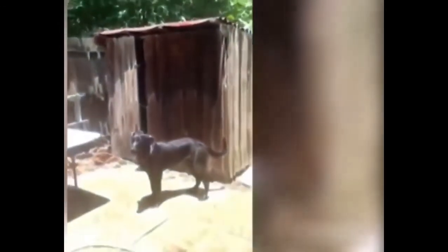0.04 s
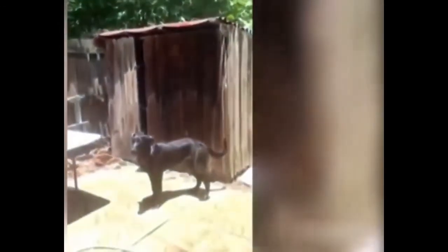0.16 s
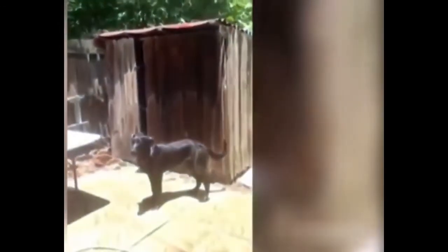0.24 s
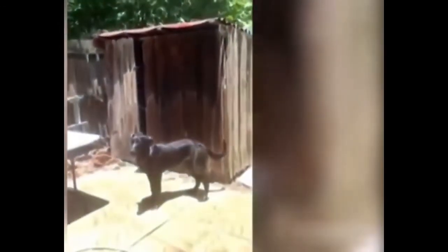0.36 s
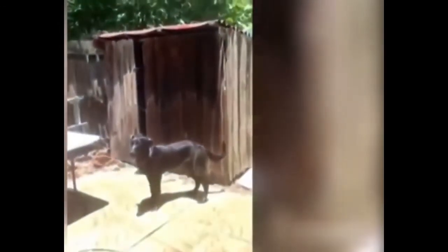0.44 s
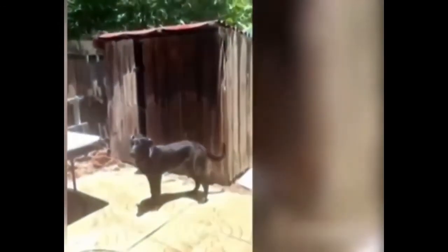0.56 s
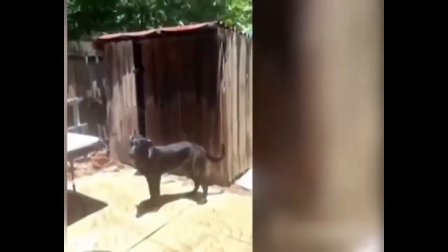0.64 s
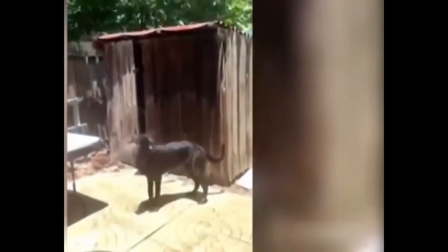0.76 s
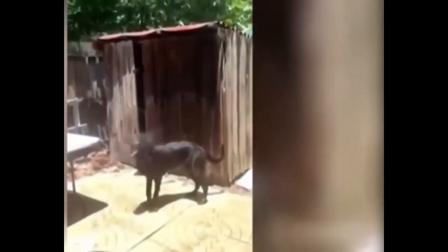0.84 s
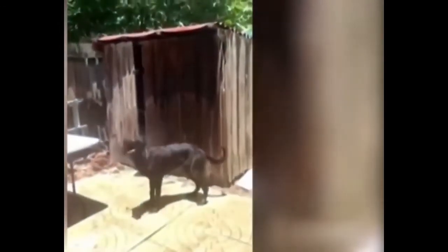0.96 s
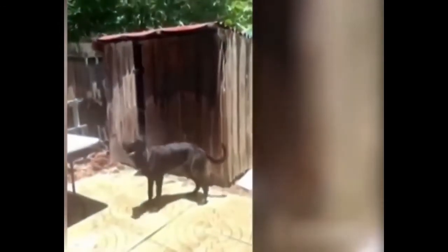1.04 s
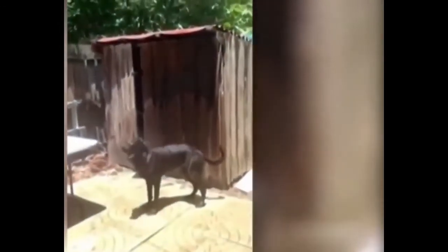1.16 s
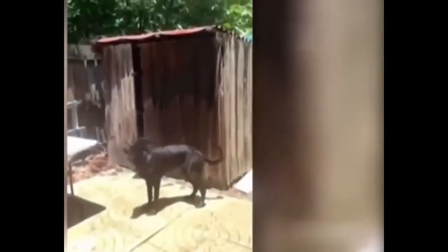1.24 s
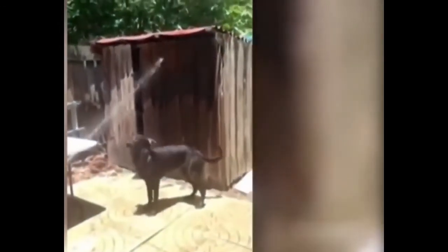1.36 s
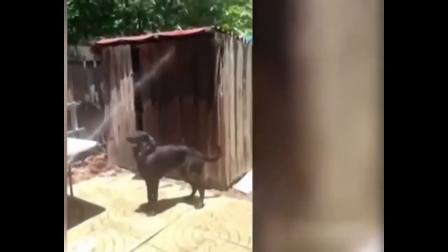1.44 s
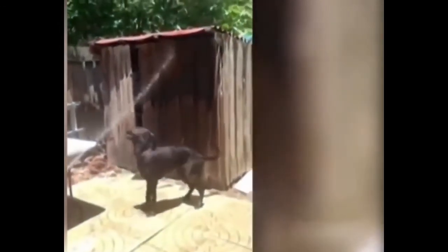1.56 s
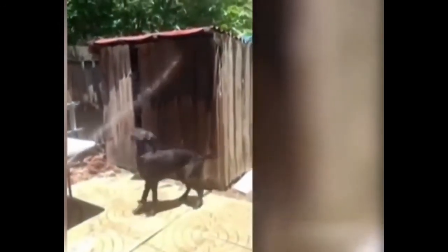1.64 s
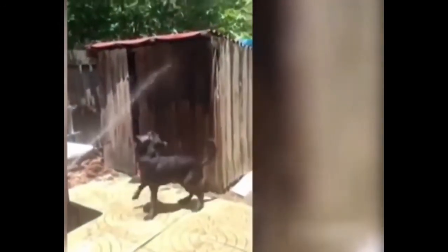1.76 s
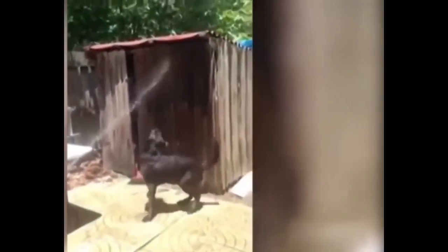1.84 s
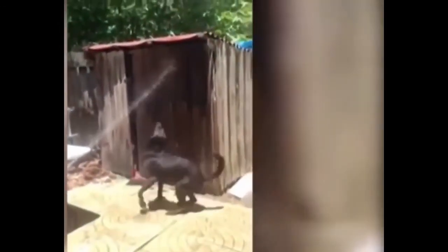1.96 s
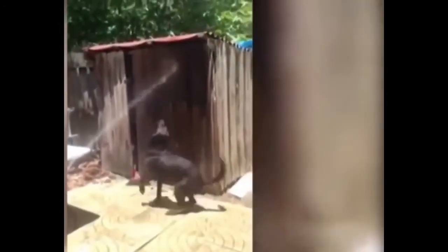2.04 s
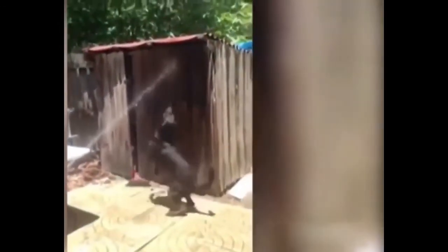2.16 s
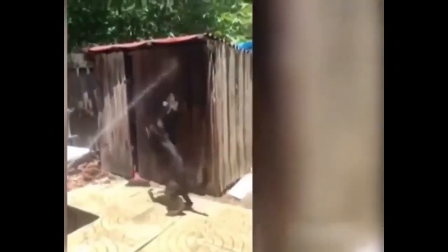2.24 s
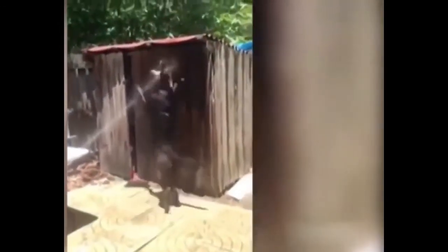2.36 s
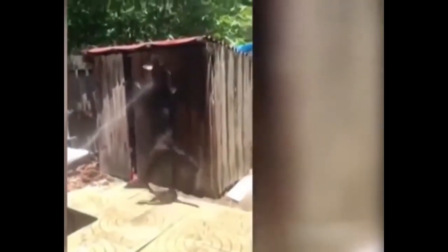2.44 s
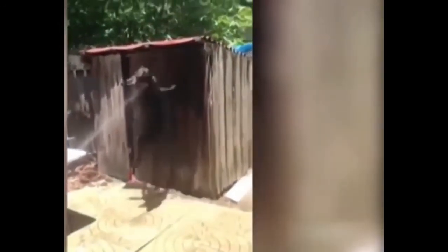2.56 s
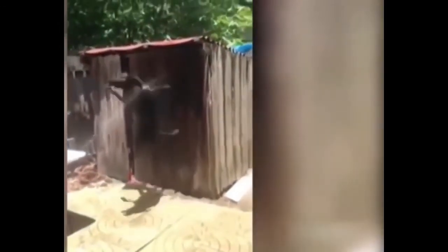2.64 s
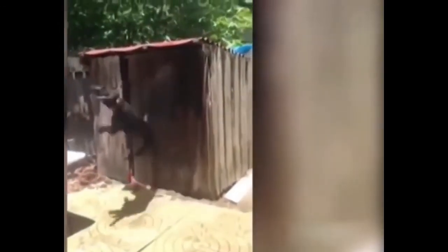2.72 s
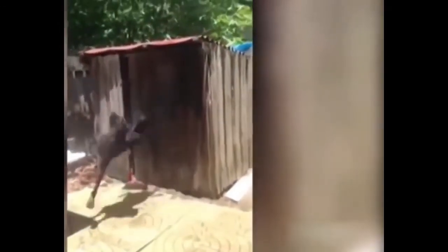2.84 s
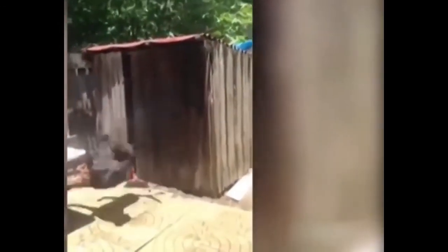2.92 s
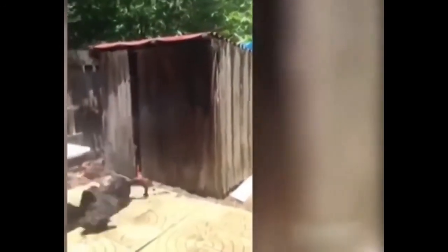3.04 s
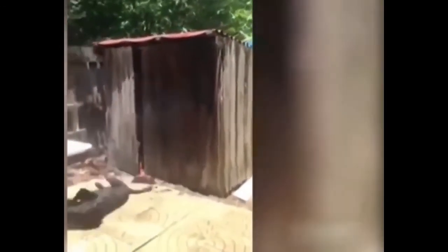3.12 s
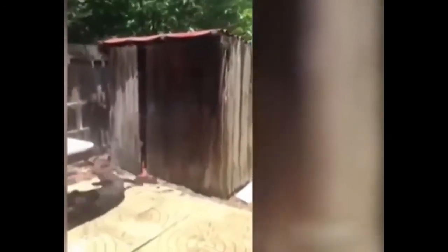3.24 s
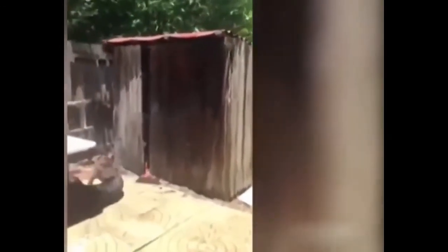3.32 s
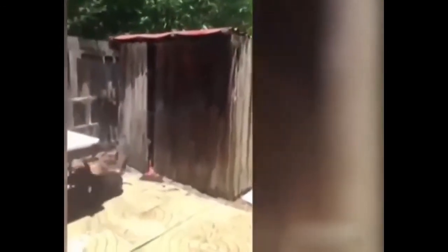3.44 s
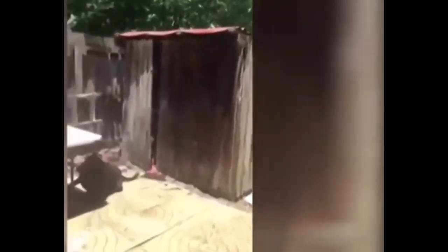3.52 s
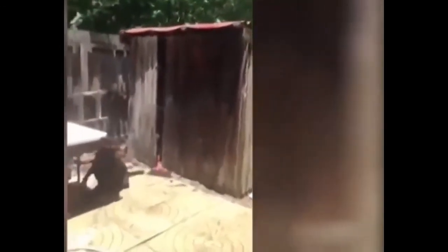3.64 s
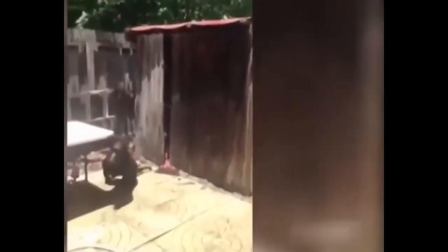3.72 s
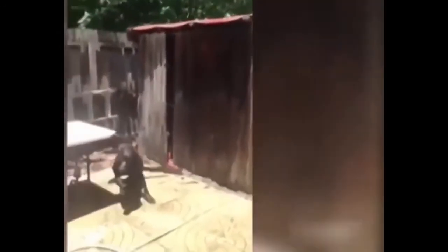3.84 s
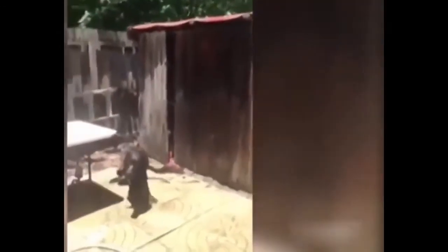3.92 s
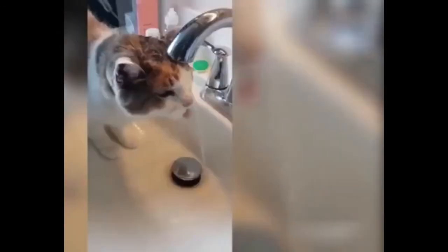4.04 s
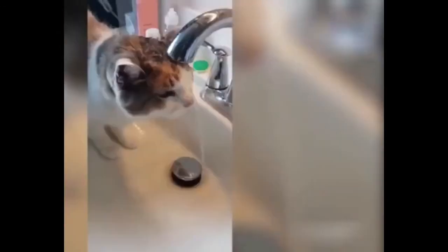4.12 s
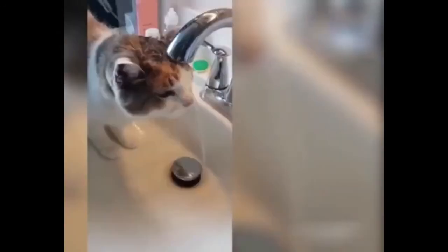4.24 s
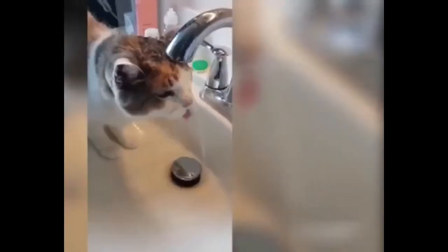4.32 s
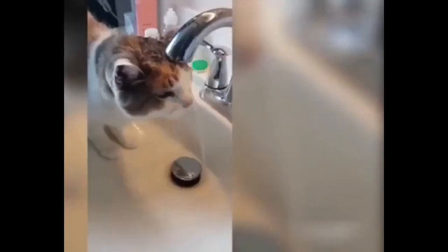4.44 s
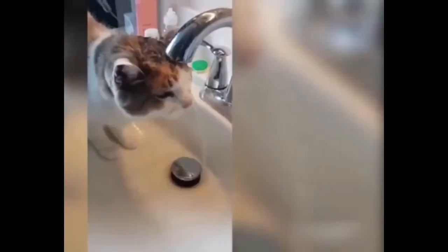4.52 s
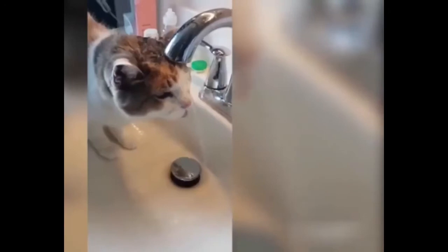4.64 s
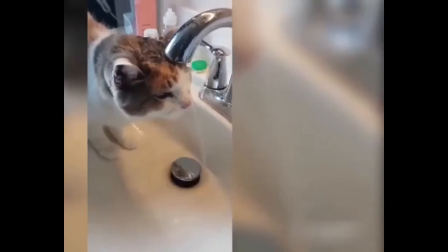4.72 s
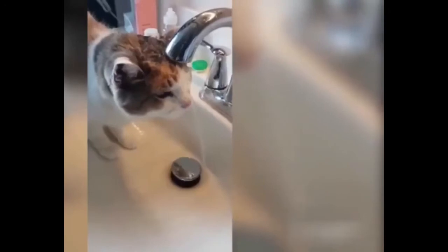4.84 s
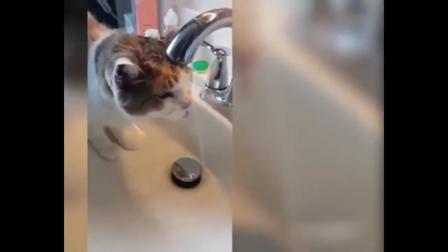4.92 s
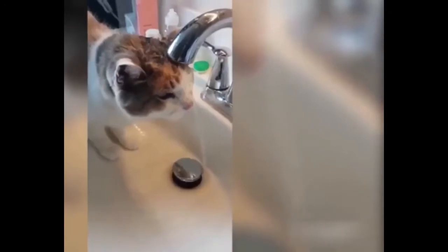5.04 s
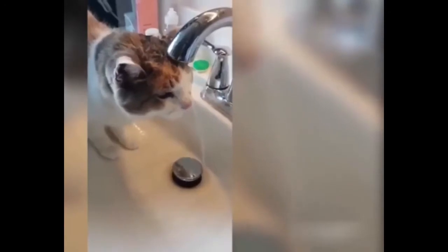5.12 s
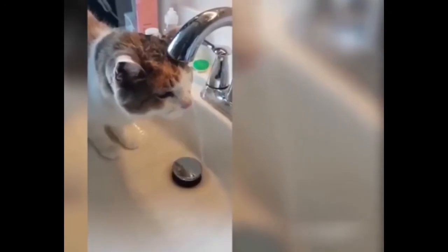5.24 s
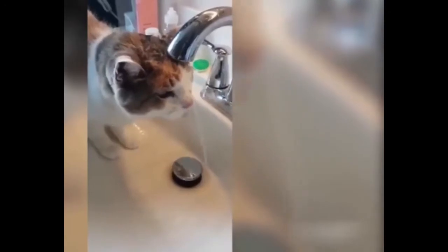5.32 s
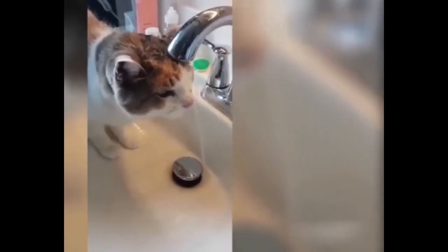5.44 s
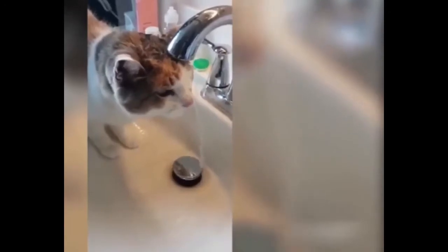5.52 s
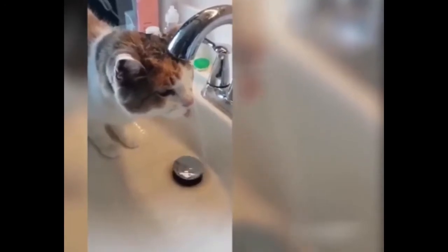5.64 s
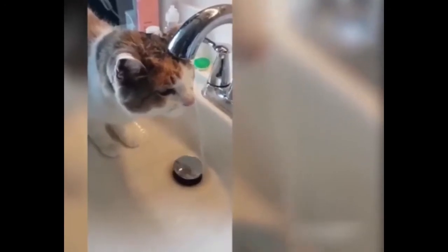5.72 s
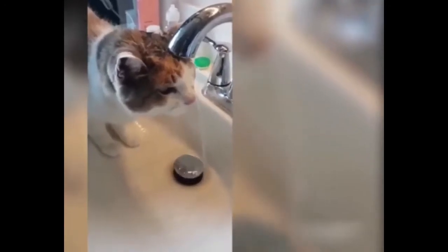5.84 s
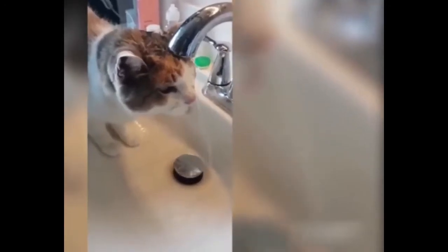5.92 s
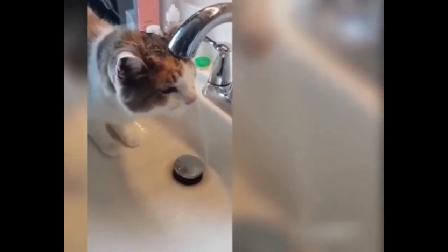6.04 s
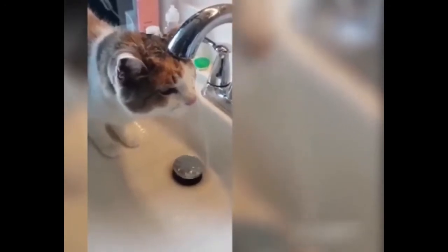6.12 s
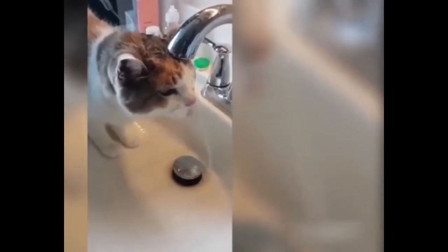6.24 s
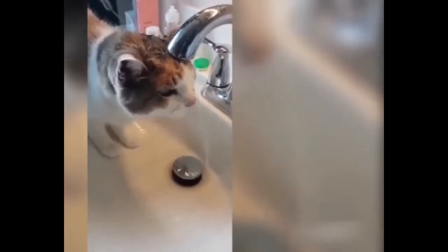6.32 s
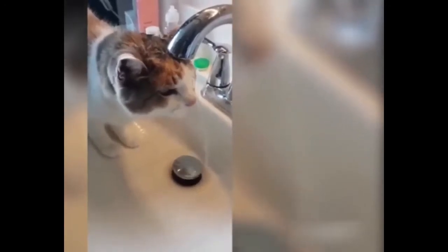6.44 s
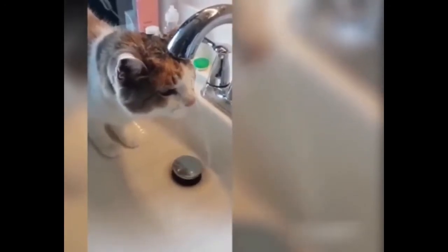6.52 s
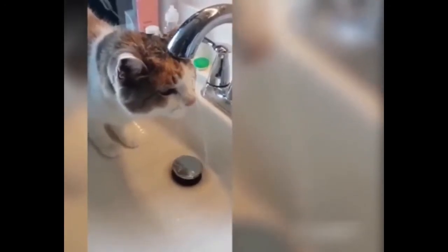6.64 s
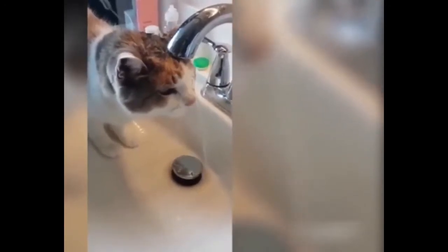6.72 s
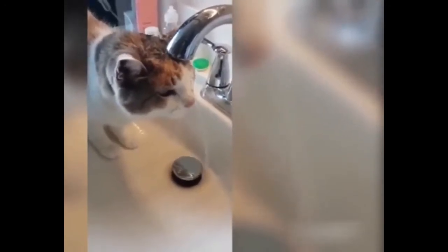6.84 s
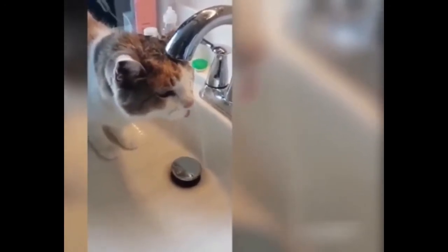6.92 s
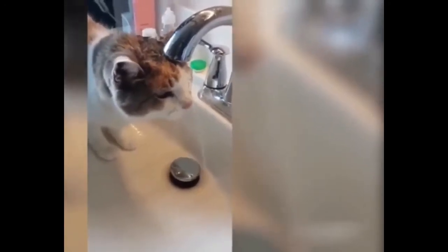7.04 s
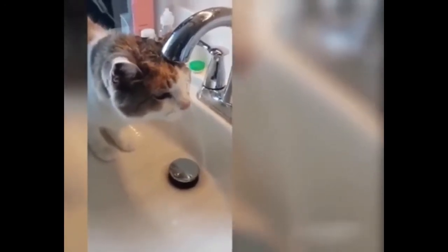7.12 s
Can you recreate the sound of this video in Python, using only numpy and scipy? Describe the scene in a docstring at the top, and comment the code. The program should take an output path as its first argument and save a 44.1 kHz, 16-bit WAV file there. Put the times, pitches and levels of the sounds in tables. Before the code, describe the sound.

The sound opens in a quiet yard with soft air and a low, distant machine hum. A bird gives one faint, falling whistle at about 0.3 seconds. From 0.8 to 1.4 seconds a garden hose spits, and at 1.6 its jet starts hissing and pattering on a wooden shed, surging briefly at 2.5. A dog's collar tags jingle on and off from 1.1 to 3.9 seconds. Between 2.9 and 3.3 the dog hits the shed and ground with several rattling, booming thumps, the loudest sounds here. Paws scuff lightly on paving and the spray fades. At about 4.1 seconds the sound cuts to a bathroom, where a thin tap stream fizzes softly and steadily in a sink over a low room murmur. About six drops plink in the drain, clearest at 5.2 and 5.5. Tiny bubbles tick close by on both sides, the sharpest near 6.9 seconds.

```python
"""Dog, garden hose and sink

A bird whistles in a quiet yard. A hose spits, then its jet hisses and drums on a wooden shed.
A dog with jingling collar tags leaps at the water, thumps against the boards and runs off.
Then a bathroom: a thin stream from a tap fizzes in the sink, falling drops make the drain
pipe plink, and tiny bubbles burst with sharp ticks."""
import sys
import numpy as np
from scipy import signal
from scipy.fft import rfft, irfft, next_fast_len
from scipy.io import wavfile
from scipy.ndimage import uniform_filter1d, map_coordinates

SR = 44100
rng = np.random.default_rng(int(sys.argv[2]) if len(sys.argv) > 2 else 0)


def dump(signal):
    """Clip the signal to [-1, 1] and save it as 16-bit WAV at the path in sys.argv[1]."""
    limited = np.clip(np.atleast_2d(signal).T, -1, 1)
    pcm = np.round(limited * 32767).astype(np.int16)
    wavfile.write(sys.argv[1], SR, pcm)


N = 316197

# A "fade" is the time a sound takes to die down by 60 dB. A "mode" is one ringing tone of an object.
# outdoor air (frequency [Hz], level [dB])
AIR_SPECTRUM = [(15, -48), (25, -42), (49, -0.5), (154, -9), (181, -10.5), (237, -3.5), (515, -17.5),
                (1420, -22), (2560, -28), (2930, -28), (12100, -43), (15000, -40)]
# far machinery (frequency [Hz], width [Hz], level [dB])
MACHINE_MODES = [(73, 12, -6), (151.5, 6.8, -4.5), (236.3, 4.6, 0.5)]
# echo off the fence and shed (frequency [Hz], fade [s])
YARD_ECHO = [(200, 0.4), (4000, 0.36), (12000, 0.3)]
# nozzle spits (time [s], level [dB], rise [s], fade [s], centre [Hz], width [share of centre])
NOZZLE_SPITS = [(.773, -40.5, 0.0027, 0.057, 5870, 1), (.777, -51.5, 0.004, 0.25, 3180, 0.5),
                (.89, -49.5, 0.033, 0.34, 7900, 3.5), (.935, -42, 0.024, 0.23, 7500, 3.5),
                (1.056, -42.5, 0.0021, 0.04, 3770, 0.65), (1.165, -56.5, 0.016, 0.4, 3630, 1.3),
                (1.356, -42.5, 0.018, 0.074, 5140, 1.1)]
# louder clashes of the collar tags (time [s], level [dB])
TAG_CLASHES = [(1.11, -54), (1.131, -48), (1.1742, -39.5), (1.191, -35), (1.270, -42), (1.3416, -41),
               (1.5058, -44), (1.6354, -33.5), (1.812, -35.5), (2.039, -42), (2.722, -33), (2.83, -36.5),
               (3.334, -43.5), (3.407, -45), (3.497, -38)]
# ringing of the tags (frequency [Hz], level [dB], fade [s])
TAG_MODES = [(5700, -22.5, 0.08), (7010, -11, 0.12), (7978, -12.5, 0.15), (8760, -3.5, 0.11),
             (8830, -13.5, 0.07), (11230, -17, 0.062), (12850, -21, .17), (14700, -16, 0.09),
             (14900, -18, 0.12)]
# the jet's hiss (frequency [Hz], level [dB])
HISS_SPECTRUM = [(1500, -4), (4000, 4.5), (7000, 0.5), (10000, 1.5), (12500, 4.5), (15000, 1)]
# drops hitting the shed (frequency [Hz], level [dB])
SPLATTER_SPECTRUM = [(120, -21), (300, 3.5), (600, 3), (1100, -2), (2000, 3), (2800, -1), (3800, 0),
                     (5200, -8.5), (9000, -5), (15000, -30)]
# paws on paving (time [s], level [dB], rise [s], fade [s], centre [Hz], width [share of centre])
PAW_SCUFFS = [(2.243, -50, .004, .12, 4200, .7), (2.698, -38, 0.01, 0.18, 4330, 0.39),
              (3.39, -52, 0.047, 0.3, 3350, 0.56), (3.454, -40, 0.002, 0.16, 4300, 0.29),
              (3.694, -53.5, 0.0011, 0.031, 2500, 2.2), (3.869, -51.5, .001, 0.067, 4970, 0.88),
              (3.88, -54.5, 0.03, 0.42, 2480, 0.55)]
# the dog hits shed and ground (time [s], level [dB], rise [s], fade [s], brightness [Hz], boom [dB])
DOG_THUMPS = [(2.545, -38, 0.009, 0.079, 860, 1), (2.591, -59, 0.0066, 0.11, 150, 20),
              (2.76, -46, 0.0089, 0.16, 600, -6), (2.88, -21, 0.0013, 0.24, 1440, -5.5),
              (2.891, -26.5, 0.0041, 0.094, 1600, -5), (3.012, -22.5, 0.0056, 0.35, 910, -4),
              (3.035, -28, 0.0052, 0.32, 3720, 1), (3.199, -20, 0.00042, 0.11, 4220, -16),
              (3.222, -33.5, 0.0036, 0.39, 2050, -3), (3.403, -48, 0.0044, 0.038, 300, 3.5),
              (3.621, -57, 0.0089, 0.13, 200, 11)]
# rattle of loose boards (frequency [Hz], level [dB])
BOARD_SPECTRUM = [(24, -41), (40, -26), (59, -6), (111, -7), (142, -3), (182, -7.5), (263, -3.5),
                  (432, -6.5), (541, -6), (1080, -12), (1870, -10), (2920, -17), (3650, -14.5),
                  (15000, -37.5)]
# boom of the shed wall (frequency [Hz], width [Hz], level [dB])
WALL_MODES = [(60.1, 9.1, 4.5), (79, 26, 2.5), (111, 13, -1), (144, 7.9, 3.5), (268, 9.6, 2.5),
              (306, 14, 1.5), (398, 16, -8), (559, 37, -6), (670, 16, -9), (702, 40, -1), (1007, 31, 2),
              (1180, 25, -18)]
# water hitting the basin (frequency [Hz], level [dB])
STREAM_SPECTRUM = [(530, -51), (900, -19), (1070, -7), (1220, -16), (1540, -11.5), (1850, -8), (2500, -2.5),
                   (3510, -10), (4280, -8), (6350, -2), (7470, -7), (8590, -3), (9880, -10), (11800, -11.5),
                   (14500, -16.5)]
# ringing of the thin film of water (frequency [Hz], width [Hz], level [dB])
FILM_MODES = [(2550, 290, -6), (6450, 160, 3.5), (8900, 850, -14), (11400, 380, -7.5)]
# the bathroom's murmur (frequency [Hz], level [dB])
ROOM_SPECTRUM = [(15, -54), (25, -18), (59, -8.5), (130, 1.5), (168, -4), (340, -6.5), (376, -13),
                 (656, -10.5), (714, -13.5), (1400, -19.5), (1820, -37), (3080, -120)]
# the bathroom's stereo spread (frequency [Hz], sides over middle [dB])
STEREO_SPREAD = [(60, -5), (110, -11.5), (200, -10.5), (380, -4.5), (700, -4.5), (1290, -2), (2380, -2.5),
                 (4400, 0.5), (8120, 1), (15000, -1)]
# drops falling into the drain (time [s], low modes [dB], middle modes [dB], upper modes [dB])
DRAIN_DROPS = [(4.104, -45.5, -29.5, -33.5), (4.817, -44, -41, -51), (5.171, -28, -45, -54),
               (5.547, -57, -38, -33), (6.349, -45, -41, -51), (6.742, -43.5, -38.5, -43)]
# ringing of the drain pipe (frequency [Hz], level [dB], fade [s])
PIPE_MODES = [(335, -12, 0.12), (932.6, -7, 0.21), (985, -16, 0.15), (1158, -5.5, 0.054),
              (1773, -1.5, 0.045), (2046, -10.5, 0.065), (2134, -4.5, 0.027), (2240, -2, 0.012),
              (2500, -18, 0.034), (2806, -12.5, 0.05), (4500, -23.5, 0.12)]
# echo of the bathroom (frequency [Hz], fade [s])
BATHROOM_ECHO = [(200, 0.22), (2000, 0.36), (12000, 0.03)]
# bubbles bursting close by (time [s], level [dB], fade [s], centre [Hz], left over right [dB])
BUBBLE_POPS = [(4.213, -50, 0.055, 6700, 7), (4.478, -50, .02, 9700, -13), (5.18, -50, .008, 12400, -11),
               (5.492, -53.5, .06, 4660, 10), (5.513, -50, 0.044, 7640, -2), (5.768, -47, .006, 12500, -14),
               (5.7765, -42, 0.025, 4180, 5), (6.338, -50, .006, 12500, -13),
               (6.628, -42.5, 0.0046, 12400, -20), (6.9356, -27.5, 0.0028, 9900, -13)]


def amp(db):
    """Turn decibels into a factor to multiply by."""
    return 10 ** (np.asarray(db) / 20)


def unit(x):
    """Scale a sound to an average strength (rms) of 1."""
    return x / np.sqrt(np.mean(x ** 2) + 1e-20)


def clock():
    """The time of every sample, in seconds."""
    return np.arange(N) / SR


def ramp(start, length):
    """A straight rise from 0 to 1."""
    return np.clip((clock() - start) / length, 0, 1)


def since(start):
    """Seconds gone by after the start."""
    return np.maximum(clock() - start, 0)


def along(points, hz):
    """Read between (frequency, value) points, on a log frequency scale."""
    frequencies, values = np.transpose(points)
    return np.interp(np.log(hz + 1), np.log(frequencies), values)


def wobble(rate):
    """A smooth curve through `rate` random values a second."""
    return map_coordinates(rng.standard_normal(int(N * rate / SR) + 4), [clock() * rate])


def filtered(x, response):
    """Multiply each frequency in a sound by response(frequency)."""
    n = x.shape[-1]
    padded = next_fast_len(n + SR // 4)
    return irfft(rfft(x, padded) * response(np.fft.rfftfreq(padded, 1 / SR)), padded)[..., :n]


def coloured(x, spectrum):
    """Shape a sound's lows and highs with a spectrum, at strength 1."""
    return unit(filtered(x, lambda hz: amp(along(spectrum, hz))))


def resonant(x, modes):
    """Let a sound ring through (frequency, width, level) modes, at strength 1."""
    def response(hz):
        return sum((-1) ** k * amp(db) * 1j * hz * width / (centre ** 2 - hz ** 2 + 1j * hz * width)
                   for k, (centre, width, db) in enumerate(modes))
    return unit(filtered(x, response))


def patter(rate, spread_db, n=N):
    """Tiny impacts of random size, about `rate` a second."""
    hits = rng.random(n) < rate / SR
    return unit(hits * rng.standard_normal(n) * amp(spread_db * rng.standard_normal(n)))


def patchy(x, depth_db, bands):
    """Make the tone colour flicker, in patches some tens of milliseconds long."""
    slices = signal.stft(x, nperseg=512)[2]
    patches = uniform_filter1d(rng.standard_normal(slices.shape), bands, axis=0)
    patches = uniform_filter1d(patches, size=8, axis=1)
    return unit(signal.istft(slices * amp(depth_db * unit(patches)), nperseg=512)[1][:len(x)])


def swell(rise, fade):
    """Half a second of loudness shape: a straight rise, then a steady dying away."""
    t = np.arange(SR // 2) / SR
    return np.minimum(t / max(rise, 1 / SR), 1) * amp(-60 * np.maximum(t - rise, 0) / fade)


def add(track, time, sound):
    """Mix a sound into a track at a time in seconds."""
    start = round(time * SR)
    part = track[..., start:start + sound.shape[-1]]
    part += sound[..., :part.shape[-1]]


def echo(x, fades):
    """A blurred stereo echo in which each frequency dies at its own speed."""
    hz, t, slices = signal.stft(rng.standard_normal((2, SR // 2)), SR, nperseg=256)
    tail = signal.istft(slices * amp(-60 * t / along(fades, hz)[:, None]), SR, nperseg=256)[1]
    return signal.fftconvolve(np.atleast_2d(x), tail / np.linalg.norm(tail[0]), axes=1)[:, :N]


def bursts(rows, grain_rate):
    """Short grainy rushes, each around its own centre frequency."""
    out = np.zeros(N)
    for time, db, rise, fade, hz, width in rows:
        grains = resonant(patter(grain_rate, spread_db=2.5, n=SR // 2), [(hz, width * hz, 0)])
        add(out, time, amp(db) * swell(rise, fade) * patchy(grains, depth_db=2.5, bands=6))
    return out


def yard_air():
    """Outdoor air murmurs over the low drone of far machinery."""
    air = amp(-58.5 + 0.74 * wobble(4.92)) * coloured(rng.standard_normal(N), AIR_SPECTRUM)
    return air + amp(-59.5) * resonant(rng.standard_normal(N), MACHINE_MODES)


def bird():
    """A thin whistle with a faint upper tone; it falls ever faster and gets rougher as it goes."""
    start_s, length_s, rise_s, release_s = .28, .53, .2, .33
    start_hz, fall_hz = 3480, 596
    progress = ramp(start_s, length_s)
    hz = start_hz - fall_hz * progress ** 1.5
    roughness = (.006 + .014 * progress) * wobble(420)
    phase = 2 * np.pi * np.cumsum(hz * (1 + roughness + 0.0037 * wobble(34.7))) / SR
    release = 1 - ramp(start_s + length_s - release_s, release_s)
    singing = np.sqrt(ramp(start_s, rise_s)) * release
    whistle = np.sin(phase) + amp(-19) * np.sin(1.52 * phase)
    return singing * amp(-62 + 3.4 * wobble(59.9)) * whistle


def hose_spits():
    """Air and water spit from the nozzle before the jet comes through."""
    return bursts(NOZZLE_SPITS, grain_rate=12000)


def jiggles(count):
    """Soft, uneven tag clashes that fade as the dog trots off (time [s], level [dB])."""
    start_s, length_s, fade_db_per_s = 3.34, 0.56, 16
    delays = length_s * (np.arange(count) + rng.random(count)) / count
    return [(start_s + delay, -49 - fade_db_per_s * delay) for delay in delays]


def collar_tags():
    """At every clash the loose tags touch three times, ringing at new strengths each time."""
    out, t = np.zeros(N), np.arange(SR // 4) / SR
    hz, level, fade = np.transpose(TAG_MODES)[:, :, None]
    onset = np.minimum(t / 0.00056, 1)
    for time, db in TAG_CLASHES + jiggles(count=8):
        for delay, softer_db in [(0, 0), (rng.uniform(.004, .012), -3), (rng.uniform(.014, .034), -7)]:
            strength = amp(level + 3 * rng.standard_normal(hz.shape) - 60 * t / fade)
            detuned = hz * (1 + 0.0026 * rng.standard_normal(hz.shape))  # touching tags load each other
            ring = np.sum(strength * np.sin(2 * np.pi * (detuned * t + rng.random(hz.shape))), axis=0)
            scrape = amp(-17 - 60 * t / .04) * np.diff(rng.standard_normal(len(t) + 1))
            add(out, time + delay, amp(db - 2.5 + softer_db) * onset * (ring + scrape))
    return out


def hose_jet():
    """The nozzle hisses and drops drum on the boards, both easing as the pressure settles."""
    on_s, bite_s = 1.578, 2.52
    turned = ramp(3.535, length=0.23)  # the jet swings away from the shed
    shielded = np.sin(np.pi * ramp(2.54, length=0.22))  # the leaping dog keeps water off the boards
    nozzle = amp(-47 - 9 * since(on_s))
    mist = amp(-40.5 - 26 * since(bite_s)) * ramp(bite_s, length=0.019)  # the dog scatters the jet
    hiss_gain = np.hypot(nozzle, mist) * amp(-13 * turned + 0.38 * wobble(35.6))
    hiss = hiss_gain * coloured(patter(25000, spread_db=4), HISS_SPECTRUM)
    drops = patchy(coloured(patter(5000, spread_db=0), SPLATTER_SPECTRUM), depth_db=2.2, bands=3)
    splatter_db = -49.5 - 3 * since(on_s) - 17 * shielded - 16.5 * turned
    splatter = amp(splatter_db + wobble(24)) * drops
    return ramp(on_s, length=0.01) * (hiss + splatter)


def paw_scuffs():
    """Paws scrape over the paving in short, gritty strokes."""
    return bursts(PAW_SCUFFS, grain_rate=7000)


def dog_thumps():
    """Each blow rattles the loose boards and booms in the shed wall."""
    out = np.zeros(N)
    for time, db, rise, fade, bright_hz, boom_db in DOG_THUMPS:
        def tilt(hz):
            """Brighter blows keep more treble."""
            lift = 1 + (hz / 1500) ** 2
            return np.sqrt(lift / (1 + (hz / bright_hz) ** 2) / (1 + (hz / (3 * bright_hz)) ** 4))
        boards = coloured(patter(7000, spread_db=1.5, n=SR // 2), BOARD_SPECTRUM)
        rattle = unit(filtered(boards, tilt)) * swell(rise, fade)
        reach_hz = 0.31 * bright_hz  # soft blows reach only the low modes
        push = filtered(rng.standard_normal(SR // 2), lambda hz: 1 / (1 + (hz / reach_hz) ** 2))
        boom = amp(boom_db) * resonant(push, WALL_MODES) * swell(rise=0.0057, fade=0.22)
        add(out, time, amp(db) * (rattle + boom))
    return out


def basin():
    """Tiny impacts fizz on the basin, some ringing in the water film, over the room's low murmur."""
    impacts = coloured(patter(14000, spread_db=-0.5), STREAM_SPECTRUM)
    fizz = patchy(impacts, depth_db=1.7, bands=3)
    film = resonant(patter(7000, spread_db=2), FILM_MODES)
    water = amp(-58 + 0.16 * wobble(26)) * (fizz + amp(-5.5) * film)
    return water + amp(-65.5) * coloured(rng.standard_normal(N), ROOM_SPECTRUM)


def running_tap(top_hz=14550):
    """Reflections off the bowl spread the stream's treble widely; the bass stays near the middle."""
    middle = basin()
    side = filtered(basin(), lambda hz: amp(along(STEREO_SPREAD, hz)))
    return filtered(np.array([middle + side, middle - side]), lambda hz: hz < top_hz)


def drain_plinks():
    """Each drop rings the drain pipe with its own mix of low, middle and upper tones, plus a splash."""
    out, t = np.zeros(N), np.arange(SR // 2) / SR
    for time, low_db, middle_db, upper_db in DRAIN_DROPS:
        blend_db = min(low_db, middle_db) + 2  # the lesser modes need a broad push
        push = [(333, blend_db), (930, low_db), (1150, blend_db), (1760, middle_db), (2000, upper_db)]
        ring = sum(amp(db + along(push, hz)) * swell(0.0017, fade) * np.sin(2 * np.pi * hz * t)
                   for hz, db, fade in PIPE_MODES)
        spray = resonant(rng.standard_normal(len(t)), [(2350, 2400, 0)])
        splash = amp(middle_db - 11.5) * swell(rise=0.00015, fade=0.029) * spray
        add(out, time, ring + splash)
    return out + amp(-13) * echo(out, BATHROOM_ECHO)


def bubble_ticks():
    """Tiny bubbles burst with sharp ticks to the left and right."""
    out = np.zeros((2, N))
    for time, db, fade, hz, pan_db in BUBBLE_POPS:
        pop = rng.standard_normal(SR // 2) * swell(0.00021, fade)
        ring = resonant(pop, [(hz, 0.18 * hz, 0)])
        tick = resonant(ring, [(hz, 0.21 * hz, 0)]) * np.std(pop)
        add(out, time, amp([[db + pan_db / 2], [db - pan_db / 2]]) * tick)
    return out + amp(-4.5) * echo(out, BATHROOM_ECHO)


def scene():
    """First the yard, then a quick switch to the bathroom."""
    outdoors = bird() + hose_jet() + hose_spits() + collar_tags() + dog_thumps() + paw_scuffs()
    yard = yard_air() + outdoors + amp(-9) * echo(outdoors, YARD_ECHO)[0]
    bathroom = running_tap() + drain_plinks() + bubble_ticks()
    indoors = ramp(4.072, length=0.0048)
    return (1 - indoors) * yard + indoors * bathroom


def record(dry):
    """The microphone rounds off the loudest peaks and loses the very highest treble."""
    ceiling, top_hz = .27, 15150
    rounded = dry / (1 + (dry / ceiling) ** 4) ** .25
    return filtered(rounded, lambda hz: np.clip((top_hz - hz) / 300 + .5, 0, 1))


dry = scene()
out = record(dry)
dump(out)
```